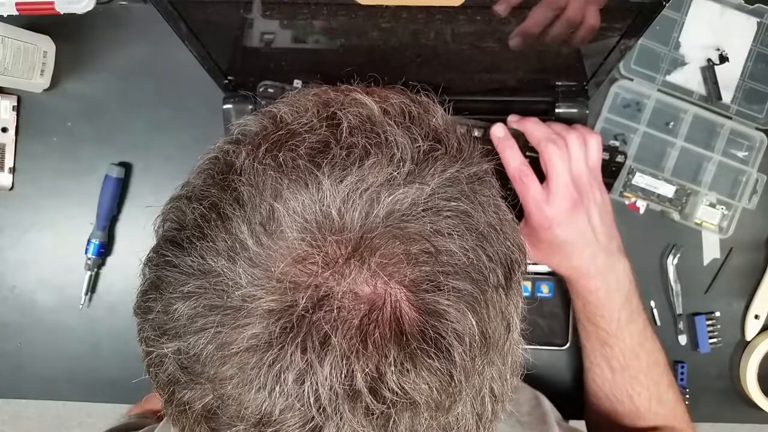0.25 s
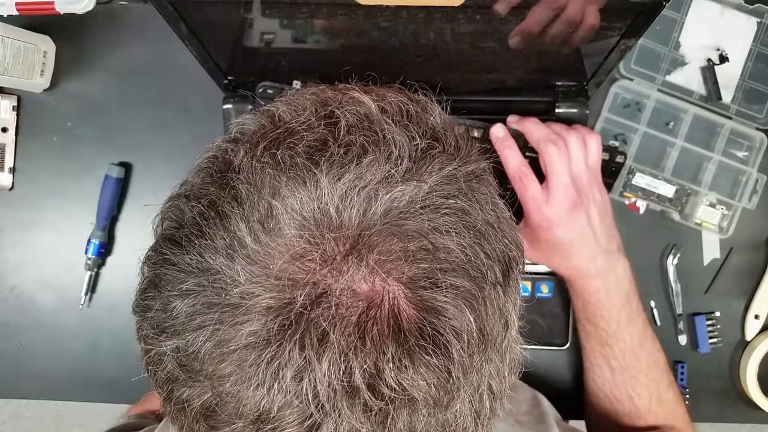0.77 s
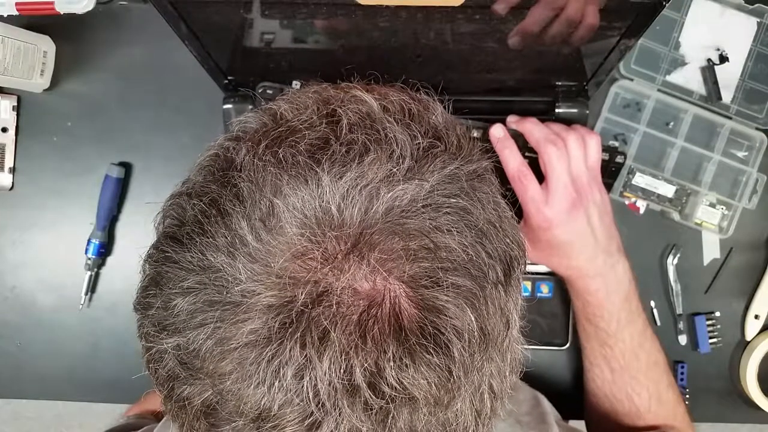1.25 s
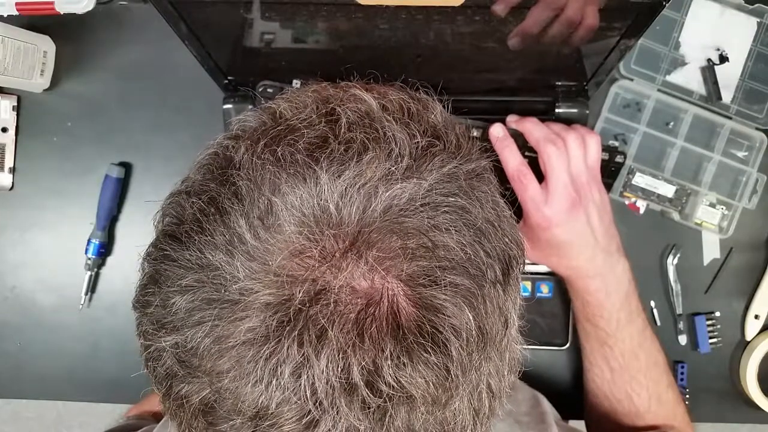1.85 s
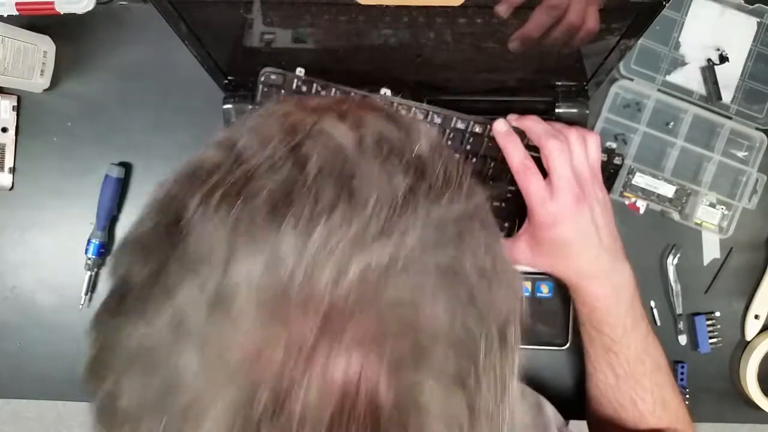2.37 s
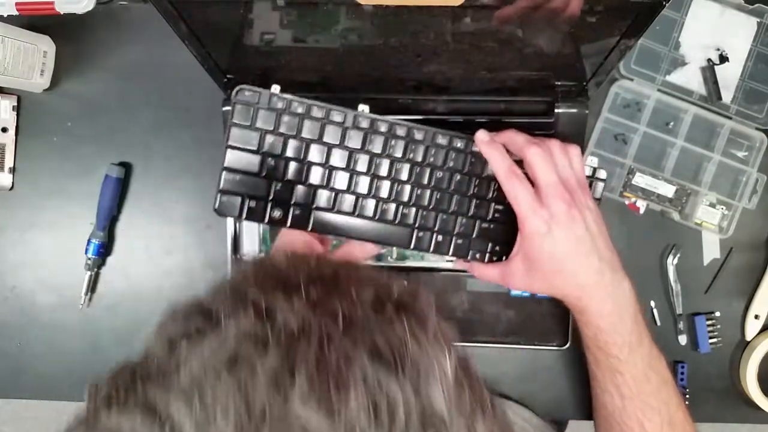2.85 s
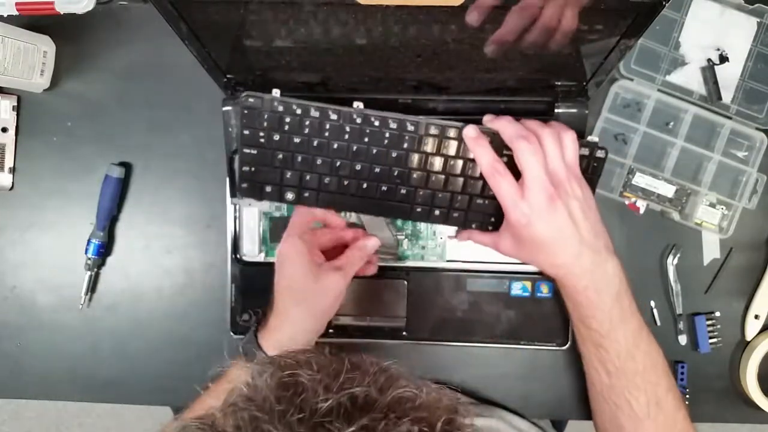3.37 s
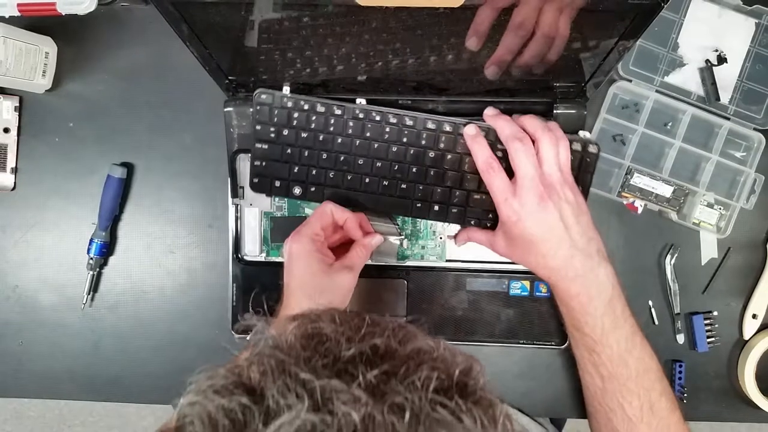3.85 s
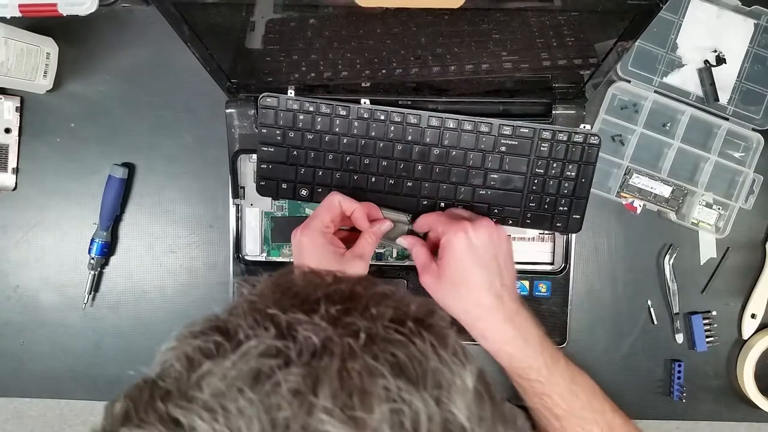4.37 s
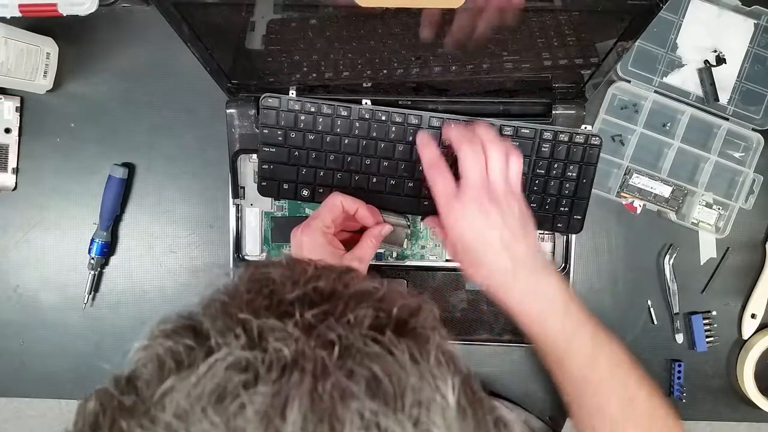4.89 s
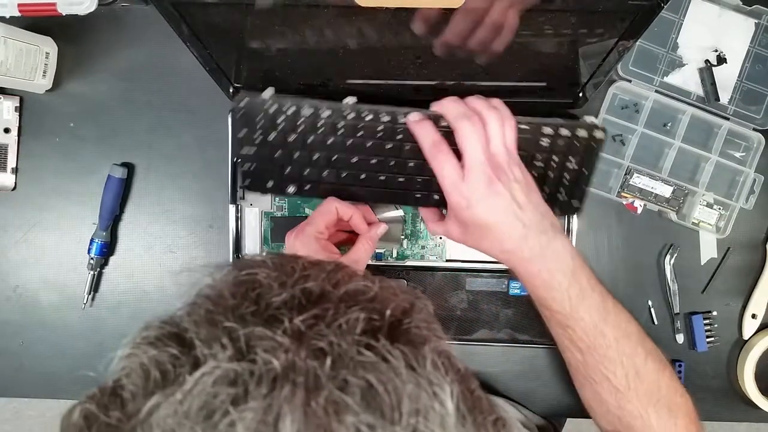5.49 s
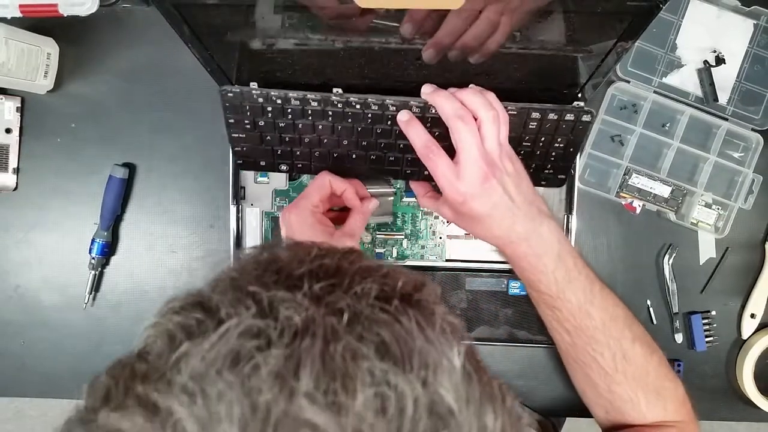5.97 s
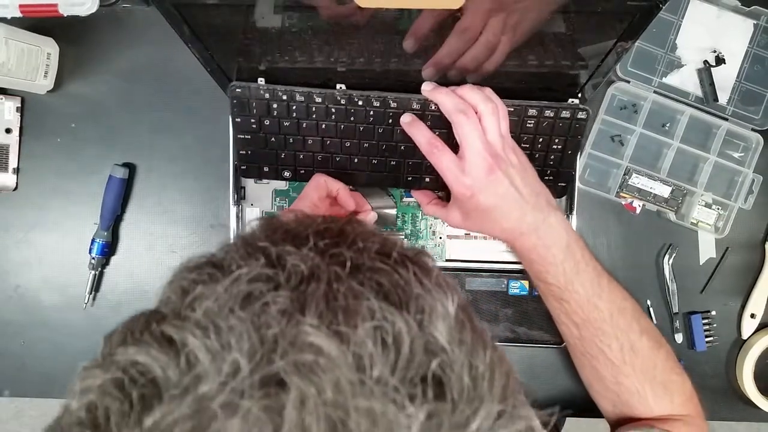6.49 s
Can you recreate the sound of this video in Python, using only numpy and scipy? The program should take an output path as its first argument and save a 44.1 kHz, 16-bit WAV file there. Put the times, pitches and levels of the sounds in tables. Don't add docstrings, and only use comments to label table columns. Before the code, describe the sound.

Close stereo pickup of laptop repair on a bench. Almost only low hum and left-side hiss at first, with faint soft bumps, then a quick cluster of dry plastic clicks. Light brushing and tiny key ticks lead to a bright, thumping keyboard drop with rattling keys. After a near-quiet pause comes a busier clatter and rub, fading into small taps and low bench thuds, right of centre, in a short dry room.

```python
import sys
import numpy as np
from scipy import signal
from scipy.fft import rfft, irfft, next_fast_len
from scipy.io import wavfile
from scipy.ndimage import uniform_filter1d

SR = 44100
rng = np.random.default_rng(int(sys.argv[2]) if len(sys.argv) > 2 else 0)


def rack_gain(trim_db):
    fader = np.asarray(trim_db, float)
    return 10 ** (fader / 20)


def file_out(sig):
    cols = np.atleast_2d(sig).T
    lim = np.clip(cols, -1, 1)
    pcm = np.round(lim * 32767).astype(np.int16)
    wavfile.write(sys.argv[1], SR, pcm)


N = 296555

# freq_hz, level_db
BRIGHT = [(400, -48.5), (1500, -32.5), (3600, -7.5), (5000, -12.5), (7000, -13.5), (9500, -14.5),
          (10600, -1.5), (12000, -1.5), (15500, -3.5), (16500, -26.5)]
# freq_hz, level_db
DULL = [(200, -54), (480, -2), (750, 3.5), (1100, -2), (1700, -3.5), (2700, -1.5), (3600, -2.5),
        (5200, -10), (8000, -67)]


def evened(x):
    return x / np.sqrt(np.mean(x ** 2) + 1e-20)


def read(points, hz):
    f, value = np.transpose(points)
    return np.interp(np.log(hz + 1), np.log(f + 1), value)


def curve(rows):
    s, *columns = np.transpose(rows)
    return [np.interp(np.arange(N) / SR, s, c) for c in columns]


def add(mix, s, sound):
    part = mix[..., round(s * SR):][..., :sound.shape[-1]]
    part += sound[..., :part.shape[-1]]


def coloured(x, points):
    log_gain = np.log(rack_gain(read(points, abs(np.fft.fftfreq(4096, 1 / SR)))))
    taps = np.fft.ifft(np.exp(np.conj(signal.hilbert(log_gain)))).real[:2048]
    return signal.oaconvolve(x, taps[None] / np.linalg.norm(taps), axes=1)[:, :N]


def wander(seconds):
    size = round(seconds * SR) + 1
    return evened(uniform_filter1d(uniform_filter1d(rng.standard_normal(N), size), size))


def grain(size):
    alike = 0.38
    own, near = rng.standard_normal((2, size))
    return np.array([alike * near + np.sqrt(1 - alike ** 2) * own, near])


def burst(db, t60_s, rise_s):
    t = np.arange(6000) / SR
    noise = grain(len(t))
    noise = noise / np.sqrt(uniform_filter1d(noise[1] ** 2, size=40) + .1)
    sputter = rack_gain(3.5 * evened(uniform_filter1d(rng.standard_normal(len(t)), size=24)))
    fall = rack_gain(-60 * t / t60_s)
    crack = 1.5 * fall ** 12
    return rack_gain(db) * np.minimum(t / rise_s, 1) * noise * (0.5 * fall * sputter + crack)


def ring(db, hz, t60_s, contact_s):
    t = np.arange(9000) / SR
    fall_db = -60 * np.maximum(t - contact_s, 0) / t60_s
    build = np.sin(np.pi / 2 * np.minimum(t * hz * 1.54, 1)) ** 2
    return rack_gain(db + fall_db) * build * np.sin(2 * np.pi * hz * t)


def knock(db, hz, t60_s):
    i = np.arange(180)
    contacts = rng.standard_normal(180) * (rng.random(180) < .04) * rack_gain(-6 - i * .08)
    contacts[0] = 1
    return np.convolve(ring(db, hz, t60_s, contact_s=0.0005), contacts / np.linalg.norm(contacts))


def slide(rise_s, hold_s, db):
    t = np.arange(8000) / SR
    swell = np.minimum(t / rise_s, 1) ** 2
    return rack_gain(db - 800 * np.maximum(t - rise_s - hold_s, 0)) * swell * grain(len(t))


def pair(points):
    # freq_hz, likeness_0_to_1
    likeness = [(60, 0.99), (180, 0.83), (550, 0), (1650, 0.017), (4970, 0.05), (15000, 0.01)]
    hz = np.fft.rfftfreq(next_fast_len(N), 1 / SR)
    a, b, c, d = rng.standard_normal((len(hz), 4)).T
    same = np.clip(read(likeness, hz), 0, 1)
    left = a + 1j * b
    both = np.array([left, same * left + np.sqrt(1 - same ** 2) * (c + 1j * d)])
    return evened(irfft(both * rack_gain(read(points, hz)), next_fast_len(N))[:, :N])


def air():
    # start_s, level_db
    flow = [(0.0, -52), (0.45, -61.5), (0.8, -56), (1.4, -47), (1.65, -47), (1.95, -46), (2.2, -57.5),
            (2.6, -64), (3.0, -54), (3.3, -57.5), (3.46, -47.5), (3.62, -59), (3.9, -54), (4.02, -46),
            (4.5, -64), (5.4, -53), (6.2, -58.5), (6.72, -52.5)]
    # freq_hz, level_db
    room_tone = [(25, -28.5), (60, 0.5), (150, -9), (300, -19.5), (600, -28), (1200, -41), (2100, -45.5),
                 (3500, -39), (4700, -38), (5800, -53.5), (9500, -61.5), (10500, -52), (15500, -43),
                 (16500, -44)]
    flow_db = curve(flow)[0]
    swing_db = flow_db - flow_db.mean()
    duct_db = -60 + 0.1 * swing_db
    room_db = -55.5 + 0.35 * swing_db + 1.2 * wander(.1)
    hum_hz = 60.14 + 0.93 * wander(0.12)
    tone = np.sin(2 * np.pi * np.cumsum(hum_hz) / SR) * rack_gain(1 + 2.0 * wander(0.025))
    hum = tone + rack_gain(-6.0) * pair([(35, -18.5), (53, -2), (60, 5.0), (68, -8.5), (95, -3.0), (140, -75.5)])
    duct = pair([(70, -42.5), (100, -2.0), (121, 5.0), (140, -18.5), (230, -7.0), (330, -27.0), (900, -70.0)])
    return rack_gain(flow_db - 0.5) * hum + rack_gain(duct_db + 1.0) * duct + rack_gain(room_db) * pair(room_tone)


def hiss():
    # start_s, level_db
    level = [(0.0, -59.5), (1.89, -54.5), (2.23, -57.5), (3.48, -56), (4.08, -58), (4.7, -61.5),
             (5.24, -60.5), (5.46, -58), (6.72, -60)]
    # freq_hz, level_db
    tone = [(2100, -40.5), (2500, -22.5), (2700, -15.5), (3030, -23), (3200, -7.5), (3600, 1), (4100, -6.5),
            (4500, -7), (5000, -22.5), (5800, -47)]
    level_db = curve(level)[0] + 0.82 * wander(0.015)
    return rack_gain(level_db + [[6], [-18]]) * coloured(rng.standard_normal((2, N)), tone)


def clock():
    first_s, every_s = .1845, .4988
    out = np.zeros((2, N))
    for s in np.arange(first_s, N / SR, every_s):
        shaded_db = -6 * (s < 1.9)
        db = -61 + shaded_db + 1.5 * rng.standard_normal()
        add(out, s, burst(db, t60_s=.025, rise_s=0.001))
    return coloured(out, BRIGHT) * rack_gain([[3], [-6]])


def rubbing():
    # start_s, level_db, dullness_db
    rub = [(0.0, -116.5, 29), (1.82, -83, 17), (2.0, -62, 2.5), (2.21, -71.5, 4), (2.47, -70, 0.5),
           (2.58, -56.5, -3.5), (2.92, -84.5, 11.5), (3.05, -63.5, -6.5), (3.65, -60, -9.5), (3.82, -73, 9),
           (3.98, -46.5, -16), (4.23, -65.5, 1.5), (4.5, -73, 1), (5.26, -88.5, 8.5), (5.43, -36, 0.5),
           (5.51, -64, 4.5), (5.9, -65.5, 6), (6.72, -78, 12.5)]
    # start_s, length_s, level_db
    brushes = [(1.814, 0.037, -66), (1.85, .04, -62), (2.525, 0.049, -70), (3.002, .07, -68),
               (3.069, .07, -64), (3.17, 0.055, -71), (3.332, .07, -68), (3.675, 0.035, -74),
               (3.79, 0.042, -55.5), (3.893, 0.046, -54), (5.233, .014, -67), (5.242, .05, -57.5),
               (5.347, 0.026, -54), (5.656, 0.035, -67), (5.81, 0.056, -72), (6.008, 0.067, -66),
               (6.31, .1, -83), (6.515, 0.032, -68), (6.57, .05, -69), (6.66, .04, -75)]
    # start_s, length_s, level_db, dullness_db
    slides = [(1.872, 0.02, -43.5, -8.5), (2.607, 0.036, -53.5, -3.5), (2.847, 0.037, -64.5, -3.5),
              (2.901, 0.11, -65, -7), (3.08, 0.037, -66, -23), (3.292, 0.094, -65, -24),
              (3.376, 0.011, -50, -2), (3.791, 0.016, -52, -23), (5.814, .036, -73, -18),
              (5.883, 0.02, -66, 0), (5.995, 0.12, -67.5, 2)]
    # freq_hz, level_db
    bench = [(120, -18.5), (190, -13.5), (220, 1.5), (270, -11.5), (450, -16.5), (900, -51)]
    rise_s, crackles_per_s = 0.016, 130
    bright, dull = np.zeros((2, 2, N))
    for s, length_s, db, dull_db in slides:
        hold_s = max(length_s - rise_s, 0)
        add(bright, s, slide(rise_s, hold_s, db))
        add(dull, s, slide(rise_s, hold_s, db + dull_db))
    rub_db, dull_db = curve(rub)
    brush = rack_gain(rub_db - 9.0)
    for s, length_s, db in brushes:
        add(brush, s, rack_gain(db) * np.sin(np.pi * np.arange(0, 1, 1 / (length_s * SR))))
    stick_slip = rack_gain(0.82 * wander(0.0092) + 1.0 * wander(0.00086))
    bright += brush * stick_slip * grain(N)
    crackle_db = rub_db + 7 + 1.2 * np.minimum(rng.exponential(1, N), 2.5)
    bright += rack_gain(crackle_db) * (rng.random(N) < crackles_per_s / SR)
    dull += rack_gain(rub_db + dull_db + 3.2 * wander(0.019) - 6) * grain(N)
    drone = coloured(rack_gain(rub_db + dull_db - 1) * grain(N)[[1, 1]], bench)
    return coloured(bright, BRIGHT) + coloured(dull, DULL) + drone


def bench_thumps():
    # start_s, peak_db, pitch_hz, t60_s
    thumps = [(2.461, -41, 216, 0.07), (2.536, -35, 220, 0.021), (2.57, -48, 258, 0.061),
              (2.596, -47.5, 224, 0.14), (2.633, -39, 213, 0.068), (3.39, -48, 268, 0.05),
              (3.901, -38, 241, 0.028), (3.972, -33.5, 153, 0.053), (3.99, -39, 200.5, 0.077),
              (5.286, -26, 210, 0.016), (5.306, -42.5, 278, 0.056), (5.392, -28, 149, 0.05),
              (3.95, -37.5, 331, 0.078), (3.995, -48.5, 339, 0.037), (5.461, -34, 198, 0.02),
              (5.472, -31, 205, 0.021), (5.487, -28.5, 169, 0.05), (5.364, -38, 129, 0.041),
              (5.528, -56, 129, .07), (3.81, -38, 121.4, 0.088), (5.401, -33.5, 328, 0.016),
              (5.402, -34, 134, 0.031), (3.9, -42, 290, 0.017), (1.936, -49, 184, 0.054),
              (1.893, -46.5, 275, 0.043), (5.66, -48.5, 194, 0.11), (5.712, -39.5, 221, 0.045),
              (5.897, -31, 209, 0.064), (5.965, -41.5, 230.3, 0.29), (6.32, -46, 224.4, 0.33),
              (6.366, -42, 226, 0.1), (6.573, -46, 185, 0.074)]
    # start_s, peak_db, pitch_hz, t60_s, contact_s
    landings = [
        (3.9431, -24, 205, .02, .005),
        (3.9475, -22, 206, .022, .0205),
        (5.4152, -26, 217, .025, .011),
        (5.4288, -27.5, 217, .03, .016),
    ]
    # start_s, peak_db
    leans = [(1.064, -41.5), (1.334, -43), (1.404, -39.5), (1.463, -38), (1.888, -46), (5.363, -51),
             (5.493, -29), (5.733, -38), (5.926, -39.5), (6.1, -42.5), (5.519, -42)]
    contact_s = 0.0062
    out = np.zeros((2, N))
    for s, db, hz, t60_s, held_s in [*((*row, contact_s) for row in thumps), *landings]:
        add(out, s, ring(db - 0.1, hz, t60_s, held_s))
        add(out, s + 0.0032, ring(db - 8.0, 123.7, 0.17, contact_s=0.002))
    for s, db in leans:
        add(out, s, ring(db + 0.5, 121.8, 0.19, contact_s))
    return out


def shell_taps():
    # start_s, peak_db, pitch_hz, crack_db (against the ring)
    taps = [(1.851, -44.5, 1300, 8), (1.879, -46.5, 1270, -6), (1.926, -40, 1700, -11),
            (1.927, -46, 1230, -9), (1.93, -44.5, 610, -6), (1.952, -40, 983, 2), (1.984, -54, 590, 9),
            (2.061, -45, 700, 0), (2.464, -49.5, 755, 0.5), (2.537, -49.5, 720, 3), (2.632, -44, 2700, 2),
            (2.637, -46, 1940, -10), (3.389, -56, 1650, -10), (3.791, -54, 1060, 8.5),
            (3.897, -52.5, 1720, 6), (3.941, -31.5, 910, 2), (3.956, -36, 724, 5), (3.973, -39.5, 960, 5),
            (3.943, -45, 680, 2), (3.942, -36.5, 1630, -11.5), (3.984, -41, 716, -10),
            (4.005, -52, 810, -4), (5.272, -42.5, 690, 4.5), (5.287, -34.5, 796, 4),
            (5.384, -42.5, 1210, 10), (5.396, -38, 1630, 6), (5.402, -38, 1200, 1),
            (5.411, -43.5, 810, 18.5), (3.958, -34, 2340, 3), (5.431, -36, 750, 10), (5.444, -48, 636, 14),
            (5.464, -39, 1730, 9), (5.492, -46.5, 860, 10), (5.686, -50, 865, 10), (5.871, -46, 646, -4),
            (6.518, -49.5, 776, -4)]
    # start_s, peak_db
    touches = [(1.468, -62), (2.181, -58.5), (2.451, -59), (2.588, -65), (2.904, -57.5), (3.275, -55.5),
               (3.858, -59), (5.136, -61), (5.169, -60.5), (5.659, -56), (5.711, -54), (6.105, -61),
               (6.121, -53), (6.497, -72), (6.568, -54)]
    # start_s, peak_db
    clacks = [(1.8515, -42), (1.9845, -40), (2.4515, -50), (2.533, -46), (2.6335, -38), (2.859, -48),
              (2.9065, -44), (2.915, -50), (3.204, -52), (3.3915, -40), (3.791, -43), (3.8566, -48),
              (3.8966, -40), (3.9412, -28), (3.9568, -28), (3.9735, -32), (5.282, -33), (5.3612, -34),
              (5.366, -36), (5.372, -38), (5.3845, -35), (5.401, -30), (5.4262, -27), (5.4405, -30),
              (5.456, -34), (5.468, -36), (5.656, -40), (5.686, -44), (5.713, -46), (6.5165, -43)]
    # start_s, peak_db, pitch_hz, t60_s
    chimes = [(1.9262, -42, 1644, .04), (2.629, -48, 1990, 0.045), (3.955, -39, 1650, .04),
              (3.956, -39, 2340, .04), (3.975, -45, 2210, .04), (2.633, -50, 3000, .03),
              (2.908, -65, 760, .05), (3.204, -62, 890, .04), (3.954, -33.5, 148, 0.053),
              (6.569, -63, 800, .04), (5.873, -52.5, 1190, 0.031), (2.536, -60, 1950, 0.034),
              (3.389, -48.5, 1620, 0.025), (3.39, -51, 500, 0.035), (3.791, -64, 1090, 0.053),
              (3.897, -58, 1670, 0.048), (3.898, -58, 1090, 0.048), (3.945, -45, 1383, 0.098),
              (3.95, -45, 2310, .08), (3.95, -57.5, 520, 0.046), (5.385, -36.5, 284, .04),
              (5.403, -34, 2010, 0.044), (5.405, -49, 726, 0.046), (5.427, -38, 1650, 0.033),
              (5.436, -45, 790, 0.045), (5.46, -43, 1690, 0.032), (5.492, -50, 970, 0.036)]
    shell_hz, touch_crack_db = 763, 4.5
    crack_t60_s, ring_t60_s = 1.46 * 0.051, .034
    dull, rings = np.zeros((2, 2, N))
    for s, db, hz, crack_db in [*taps, *((s, db, shell_hz, touch_crack_db) for s, db in touches)]:
        add(dull, s, burst(db + crack_db - 2.5, crack_t60_s, rise_s=0.0028))
        struck = knock(db - 0.4, hz, ring_t60_s)
        partner = knock(db - 16.5, 0.94 * hz, ring_t60_s)
        add(rings, s, struck + partner)
    for s, db in clacks:
        add(dull, s, rack_gain(db) * np.ones((2, 1)))
    for s, db, hz, t60_s in chimes:
        add(rings, s, ring(db, hz, t60_s, contact_s=0.0013))
    return coloured(dull, DULL) + rings


def clip_snaps():
    # start_s, peak_db
    snaps = [(1.4314, -43.5), (1.463, -55), (1.859, -51), (1.8515, -45), (1.8865, -51), (1.8885, -27.5),
             (1.9263, -20.5), (1.9537, -32), (1.9845, -24), (2.4514, -52), (2.533, -47.5), (2.584, -54),
             (2.6292, -44), (2.9716, -53), (3.3905, -33.5), (3.388, -47), (3.7903, -45), (3.8566, -53),
             (3.8714, -48), (3.8965, -33.5), (3.9424, -15), (3.9405, -37), (5.1157, -60), (5.3442, -39),
             (5.3675, -29), (5.4263, -18.5), (5.4482, -26), (5.5523, -52), (5.5792, -52), (5.6563, -34),
             (6.4018, -60), (5.263, -60), (6.5166, -42)]
    # start_s, peak_db
    rattles = [(0.2568, -73), (2.8589, -57.5), (2.9065, -54), (3.944, -25), (3.9565, -29.5),
               (3.9734, -32.5), (4.045, -58), (4.25, -66), (5.2457, -62), (5.2821, -35), (5.3615, -28.5),
               (5.3854, -36), (5.4008, -28.5), (5.4402, -29), (5.7141, -41), (6.569, -55.5)]
    # start_s, peak_db
    more_snaps = [(1.8965, -29), (1.9292, -21.5), (1.9345, -24.5), (1.941, -35), (2.623, -56), (2.636, -41),
                  (3.3763, -54), (3.9468, -28.5), (3.969, -36), (5.4072, -30.5), (5.4133, -28), (5.4565, -30),
                  (5.6712, -42), (5.7258, -49), (5.7338, -50), (6.521, -53), (6.582, -50)]
    # start_s, peak_db
    ticks = [(2.992, -60), (3.0852, -50), (3.13, -58), (3.177, -50), (3.2039, -54), (3.3206, -51),
             (3.3908, -22), (3.3921, -28), (3.3932, -25), (3.3955, -40), (3.52, -58), (3.6758, -50),
             (3.7991, -51), (3.8035, -46.5), (3.8966, -32.5), (4.0185, -45), (4.0445, -41), (4.1742, -42.5),
             (5.2835, -15), (5.2858, -22), (5.4275, -25), (5.6562, -38), (5.899, -57), (6.0322, -51),
             (6.1699, -52), (6.4991, -57), (6.6682, -53), (6.5684, -42), (6.7096, -52)]
    # start_s, peak_db, pitch_hz
    pings = [(1.8895, -38, 4620), (1.9272, -42, 4580), (1.93, -35, 4510), (1.985, -46, 4400),
             (2.6314, -49, 2950), (3.388, -43, 3900), (3.9424, -36, 3500), (3.956, -36, 3640),
             (3.9734, -38, 3380), (3.3908, -44, 4000), (5.2845, -40, 3410), (5.363, -45, 3300),
             (5.3826, -42, 2640), (5.424, -37, 3220), (5.4424, -33, 3270), (6.5166, -51, 2260),
             (6.517, -52.5, 5170)]
    bright, rings = np.zeros((2, 2, N))
    for rows, t60_s in ((snaps, 0.034), (rattles, 0.18), (more_snaps, 0.035)):
        for s, db in rows:
            add(bright, s, burst(db - 2.0, t60_s, rise_s=.0003))
    for s, db in ticks:
        add(bright, s, rack_gain(db) * np.ones((2, 1)))
    for s, db, hz in pings:
        add(rings, s, knock(db + 7.0, hz, t60_s=.012))
    return coloured(bright, BRIGHT) + rings


def keyboard():
    return rubbing() + bench_thumps() + shell_taps() + clip_snaps()


def walls(x):
    # freq_hz, t60_s
    decay = [(150, 0.22), (700, 0.42), (2500, 0.34), (6000, 0.39), (12000, 0.23)]
    taps = np.zeros((2, SR // 2))
    at = np.arange(150, SR // 2 - 20, 20)
    at = at + rng.integers(0, 20, (2, len(at)))
    np.put_along_axis(taps, at, rng.choice([-1., 1.], at.shape), 1)
    hz, t, z = signal.stft(taps, SR, nperseg=256)
    tail = signal.istft(z * rack_gain(-60 * t / read(decay, hz)[:, None]), SR, nperseg=256)[1]
    return signal.fftconvolve(x[None], tail / np.linalg.norm(tail[0]), axes=1)[:, :N]


def scene():
    # freq_hz, level_db
    shading = [(60, -7), (250, 0.5), (700, -5.5), (1500, -7.5), (3500, -17), (7000, -56), (11000, -14.5),
               (16000, -7)]
    delay_s = 0.00012
    far, near = keyboard()
    size = next_fast_len(N)
    hz = np.fft.rfftfreq(size, 1 / SR)
    shade = rack_gain(read(shading, hz)) * np.exp(-2j * np.pi * hz * delay_s)
    far = irfft(rfft(far, size) * shade, size)[:N]
    return np.array([far, near]) + walls(near) * rack_gain([[-17], [-14]]) + clock() + hiss() + air()


def top_cut(x):
    return signal.sosfilt(signal.butter(12, 16970, fs=SR, output="sos"), x)


def record(dry):
    # freq_hz, level_db
    floor = [(4800, -140), (5700, -114), (9600, -115), (10600, -124), (15600, -122)]
    # freq_hz, level_db
    low_shadow = [(5300, -77.5), (5800, -31), (7000, -35.5), (9500, -44)]
    # freq_hz, level_db
    top_shadow = [(5000, -40), (5800, -15), (9600, -13), (10500, -6), (16000, -5)]
    edge_hz, sudden_rise_db = 15900, 9
    hz, t, z = signal.stft(dry, SR, nperseg=1024)
    power = uniform_filter1d(abs(z) ** 2, size=3, axis=1)
    low = power[:, (hz > 3200) & (hz < 4800)].mean(1, keepdims=True)
    top = power[:, (hz > 10500) & (hz < 15500)].mean(1, keepdims=True)
    top_db = 10 * np.log10(top + 1e-20)
    quiet, low_mask, top_mask = (rack_gain(read(p, hz))[:, None] ** 2 for p in (floor, low_shadow, top_shadow))
    patches = np.repeat(np.repeat(rng.standard_normal((130, len(t))), 4, axis=0), 4, axis=1)
    step_db = 4 * patches[None][:, :len(hz), :len(t)]
    threshold = quiet + low * low_mask + top * top_mask
    over_db = 10 * np.log10(power / threshold + 1e-20) - step_db
    keep = np.clip(over_db / 2 + .5, .03, 1)
    sudden = np.diff(top_db, axis=2, prepend=0) > sudden_rise_db
    sudden |= np.roll(sudden, 1, axis=2)
    keep = np.where(sudden, uniform_filter1d(keep, size=48, axis=1), keep)
    keep[:, hz > edge_hz] *= np.clip(top_db / 6 + 14, 0, 1) * rack_gain(-6.5)
    keep[:, hz > 16800] = 0
    mix = signal.istft(z * keep, SR, nperseg=1024)[1][:, :N]
    return top_cut(mix)


dry = scene()
out = record(dry)
file_out(out)
```